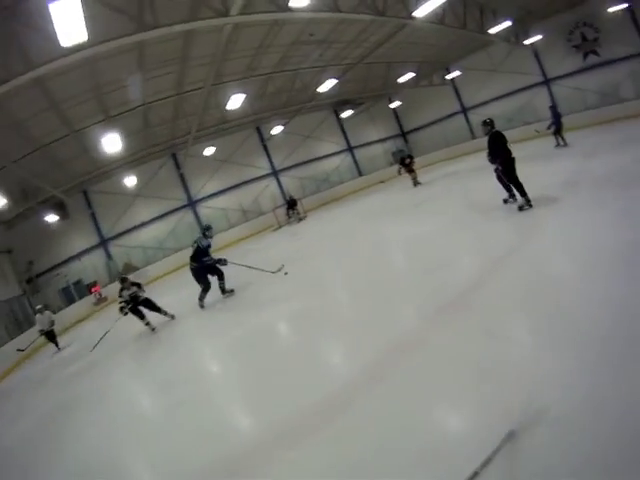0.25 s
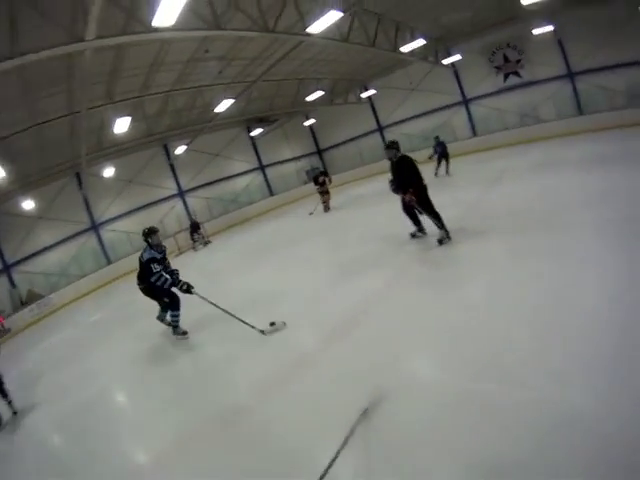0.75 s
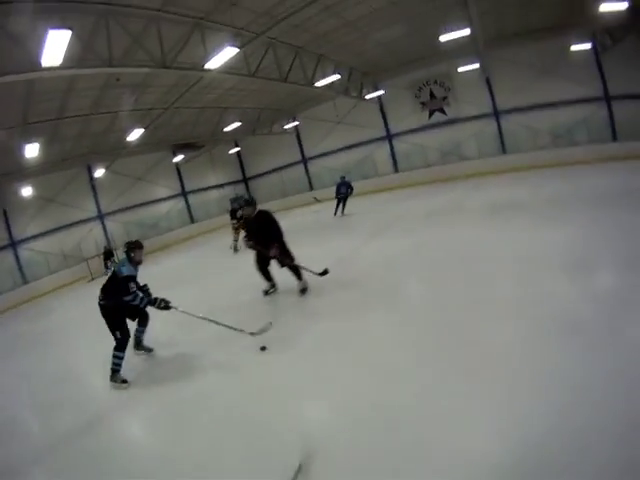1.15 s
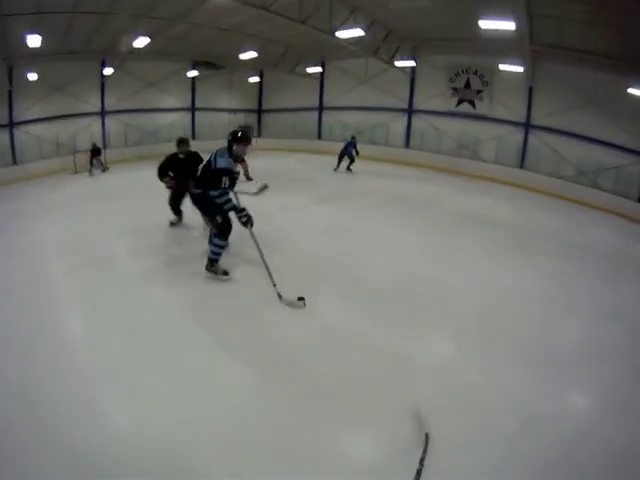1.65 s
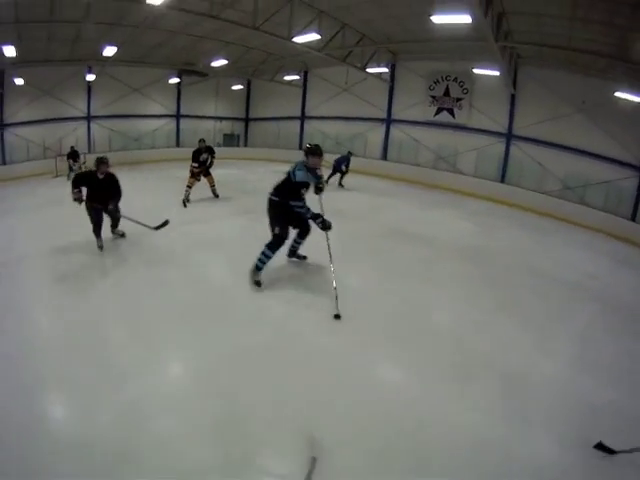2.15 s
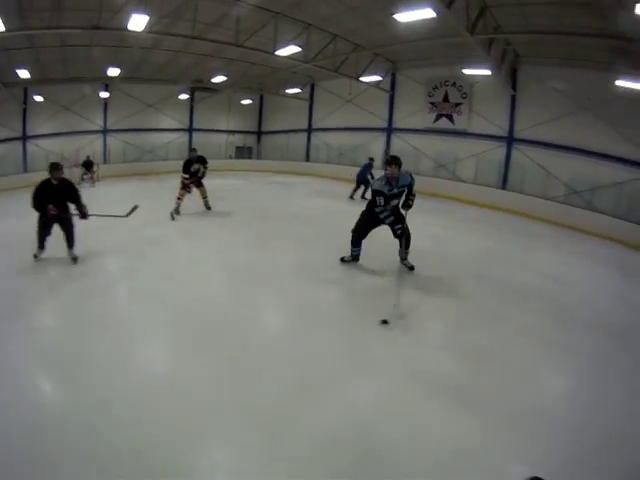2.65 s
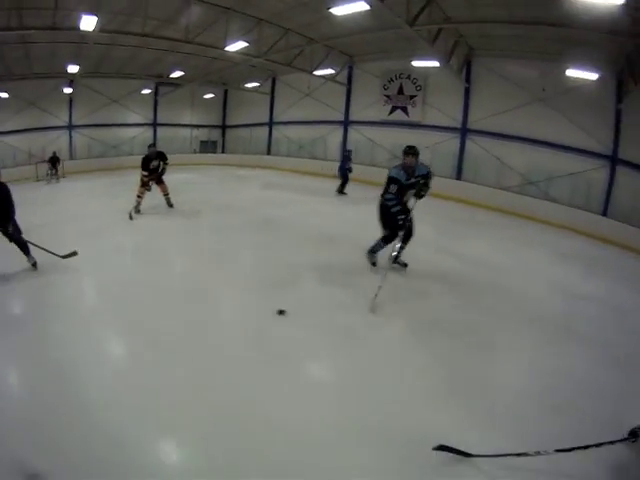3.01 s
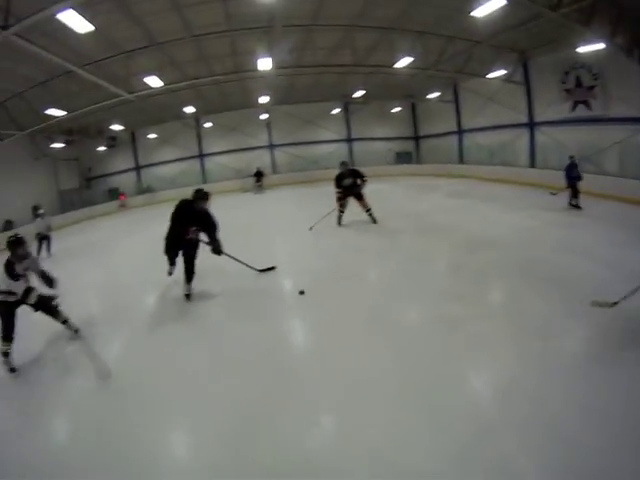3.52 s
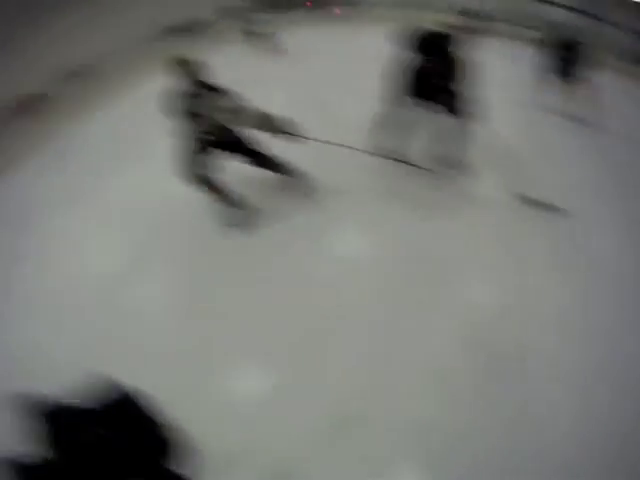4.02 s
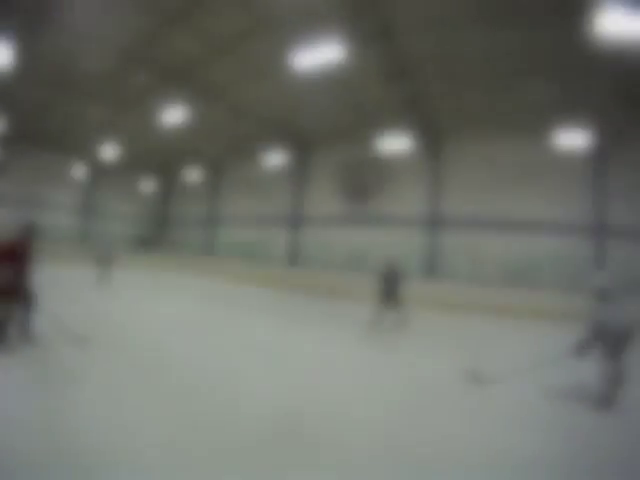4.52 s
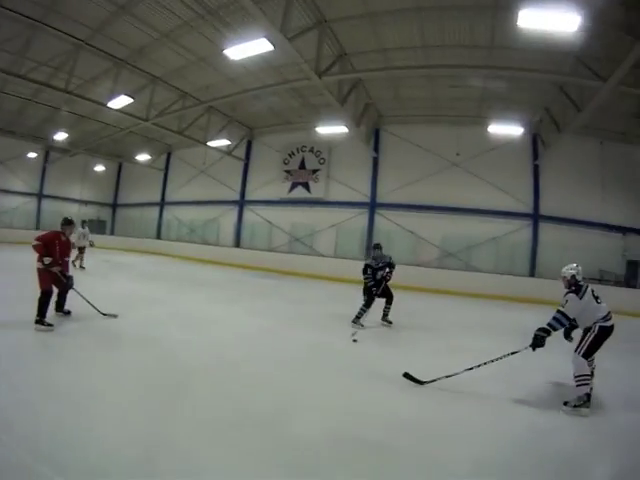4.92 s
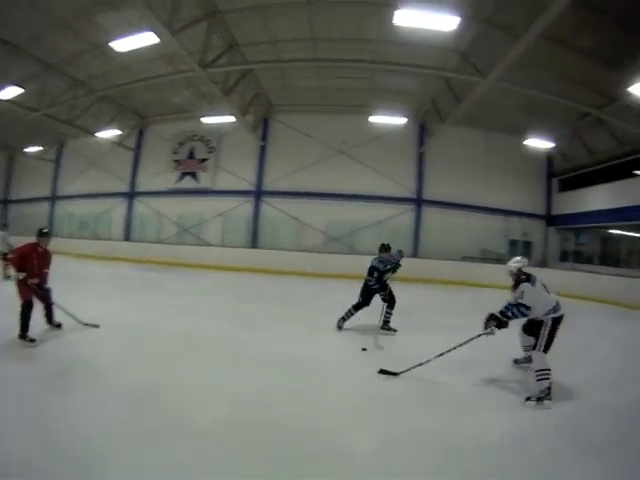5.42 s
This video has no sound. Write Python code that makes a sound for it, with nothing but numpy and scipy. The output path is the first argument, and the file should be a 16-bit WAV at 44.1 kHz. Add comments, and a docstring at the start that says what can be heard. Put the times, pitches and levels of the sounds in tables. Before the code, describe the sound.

Inside a hard helmet case at an indoor ice rink, blades hiss and growl, sticks tap, then sharp cracks lead into a loud spraying turn.

```python
"""Ice hockey inside a helmet-mounted case

An indoor rink heard from inside a hard case on a player's helmet. Blades hiss and growl (noise over random
ice-chip clicks), sticks tap (short noise bursts with a rink tail), and hard stick blows (struck modes, crack,
thud, scrape) lead into a carving turn with spray. Air (low noise) rumbles and buffets the case on the strides;
the helmet bumps (damped modes); peaks and notches of the case colour everything."""
import sys
import numpy as np
from scipy import signal
from scipy.fft import rfft, irfft, next_fast_len
from scipy.io import wavfile
from scipy.ndimage import uniform_filter1d

SR = 44100
rng = np.random.default_rng(int(sys.argv[2]) if len(sys.argv) > 2 else 0)


def output_pcm(signal):
    """Save a mono or channel-first signal as 16-bit PCM at the path in sys.argv[1].

    Samples are clipped to [-1, 1] before scaling.
    """
    pcm = np.clip(np.atleast_2d(signal).T, -1, 1) * 32767
    wavfile.write(sys.argv[1], SR, np.round(pcm).astype(np.int16))


N = 249606
T = np.arange(N) / SR

# All source levels in dB are relative: layer trims and the case follow.
# Air flow past the helmet, easing as the player coasts. Each row: time in seconds, rumble in dB.
AIRFLOW = [(0, -46.5), (.45, -39), (2.0, -45), (2.65, -40.5), (3.0, -47), (4.3, -46.5), (5.25, -50.5),
           (5.66, -46)]
# Gusts on the strides. Each row: start in seconds, big eddies in dB, length in seconds, small eddies in dB.
GUSTS = [(.005, -28.5, 0.04, -45), (0.286, -20, 0.12, -39), (0.68, -23, 0.12, -42), (1.014, -22, 0.12, -38),
         (1.157, -28, 0.072, -44.5), (1.426, -26.5, .09, -62), (1.691, -24.5, 0.0584, -49),
         (2.57, -36.5, 0.126, -57), (3.085, -30, 0.023, -58), (3.831, -29, 0.1, -47),
         (3.948, -28, 0.073, -43.5), (5.565, -31.5, 0.058, -58)]
# Air noise spectra. Each row: frequency in Hz, relative density in dB.
RUMBLE_SPECTRUM = [(15, -17), (33, 1), (48, -9), (65, -4.5), (90, -20), (200, -39), (600, -73)]
FLUTTER_SPECTRUM = [(40, -11), (90, -3.5), (135, 1.5), (200, -9), (300, -13.5), (800, -15.5), (3000, -70)]
GUST_SPECTRUM = [(15, -30), (34, 15), (60, -12), (100, -6.5), (300, -51), (1500, -74)]
FLUTTER_DB, TURN_FLUTTER_DB = -52.5, -43  # small eddies: always there, stronger in the turn
FLUTTER_FOLLOWS = 0.24  # share of the rumble's swing in dB
GUST_TOP_HZ = 257  # low-pass on the small eddies of gusts

# Wash of the other skaters, louder as the play draws near. Each row: time in seconds, level in dB.
DISTANT_SKATES = [(0, -38), (.8, -37.5), (1.1, -35.5), (2.2, -37), (3.5, -33.5), (4.2, -30.5), (4.55, -36),
                  (4.8, -34.5), (5.35, -37.5), (5.55, -32.5)]
# Skating noise spectra. Each row: frequency in Hz, relative density in dB.
HALL_SPECTRUM = [(150, -9), (300, -12), (450, -11), (650, -6.5), (880, 0), (1150, 5.5), (1600, -4),
                 (2400, -3.5), (3000, -6.5), (4500, -15), (8000, -18), (15000, -7.5)]
GROWL_SPECTRUM = [(400, -49), (680, -24), (850, 8.5), (1000, 8), (1250, 3.5), (1600, -33), (2500, -4.5),
                  (6000, -34)]
BLADE_SPECTRUM = [(300, -26), (900, 6.5), (2000, -3.5), (3300, 6.5), (4500, 2.5), (7000, 0.5), (9500, -5.5),
                  (15000, -31)]
SPRAY_SPECTRUM = [(300, -20), (800, -16), (1500, -10.5), (2200, 1.5), (3000, -3.5), (4500, -17),
                  (8000, -15), (10000, -13), (15000, -8)]

# Helmet bumps. Each row: time in seconds, level in dB.
BUMPS = [(.368, -46), (1.58, -35), (3.155, -47), (3.688, -46), (4.161, -23), (4.182, -31.5)]
# Helmet and stick modes. Each row: frequency in Hz, level in dB, T60 in seconds.
HELMET_MODES = [(63.8, -1.5, 0.38), (158, 5, 0.032), (230, 2.5, 0.034), (450, -9.5, 0.017)]
STICK_MODES = [(350, -15, 0.019), (530, -6, 0.028), (736, 1, 0.0067), (1090, 1.5, 0.031),
               (1360, 1.5, 0.011), (1550, -2.5, 0.017), (2070, -1, 0.0094), (2590, -5, 0.018),
               (4200, -13, .01)]

# Stick taps and blade set-downs. Each row: time in seconds, body in dB, bright edge in dB.
TAPS = [(.076, -34, -37.5), (.152, -40, -38.5), (.377, -37, -46), (.917, -27.5, -50), (1.072, -26, -44),
        (1.339, -27.5, -40.5), (1.409, -26, -40), (1.705, -20.5, -35), (1.791, -28.5, -46),
        (2.459, -34, -41), (2.612, -25.5, -36), (2.792, -31, -36.5), (2.853, -28, -36), (2.867, -26, -39),
        (3.584, -26, -42), (3.649, -24, -31), (3.813, -33, -35), (3.871, -36, -25.5), (5.518, -24.5, -33.5),
        (5.563, -24.5, -35), (5.574, -23.5, -44)]
# Ice contact spectra. Each row: frequency in Hz, relative density in dB.
KNOCK_SPECTRUM = [(250, -8.5), (600, 3), (1100, 13.5), (1800, 2), (2600, -11), (4500, -44), (12000, -34)]
GRIT_SPECTRUM = [(1000, -9), (2400, 7.5), (3500, 6.5), (5000, -4.5), (8000, -4), (10000, -3), (15000, 6)]
SCRAPE_SPECTRUM = [(400, -11), (1100, 10.5), (2000, 6), (4000, 4), (7500, 1), (10000, -6), (15000, 6)]
CHIPS_PER_S, CHIP_DB, CHIP_SPREAD_DB = 9, -50.5, 2  # faint ticks of blades all over the rink
RINK_T60_S, RINK_DB = 1.3, -13

# Close blows on a stick. Each row: time in seconds, ring in dB, crack in dB, scrape in dB, drag in seconds.
BLOWS = [(3.7342, -20.8, -4, -12, .0015), (3.7755, -31, -35, -36, .003), (3.8273, -30, 1.5, -20, .018),
         (3.9093, -31, -24, -25, .001)]
REBOUND_S, REBOUND_DB = 0.0012, 1.5  # second landing, relative to the first
DRAG_ATTACK_S, DRAG_RELEASE_DB_PER_S = 0.00034, 2600
THUD_GAIN_DB, THUD_TOP_HZ = 30, 422

# Nearby blade strokes. Each row: start in seconds, attack in seconds, length in seconds, hiss in dB,
# growl of the gouging edge in dB.
STROKES = [(0.145, 0.048, 0.14, -51, -57), (0.853, 0.12, .3, -46.5, -50), (1.262, 0.094, 0.16, -49.5, -57),
           (2.29, 0.16, 0.38, -43.5, -37), (2.507, 0.071, 0.11, -41.5, -36.5), (2.781, .08, 0.32, -43, -46),
           (3.096, 0.061, 0.23, -42.5, -38.5), (3.32, 0.078, 0.14, -43.5, -33),
           (4.57, 0.12, 0.52, -43, -35), (5.425, .04, 0.12, -42, -43)]
STROKE_SAG_DB_PER_S, HISS_RELEASE_DB_PER_S, GROWL_RELEASE_DB_PER_S = 7.5, 25, 70

# Hard turn: the edge bites, throws spray while the skater slows, then lets go.
TURN_START_S, TURN_LENGTH_S, TURN_ATTACK_S = 3.825, 0.38, 0.067
SPRAY_DB, SPRAY_SAG_DB_PER_S, SPRAY_RELEASE_DB_PER_S = -21.5, 10, 36.5
TURN_HISS_DB, TURN_HISS_SAG_DB_PER_S = -28.5, 28.5
# Stick blade sweeping the ice around the puck. Each row: start in seconds, length in seconds, level in dB.
SWEEPS = [(3.696, 0.034, -26), (3.77, 0.019, -23)]
SWEEP_ATTACK_S, SWEEP_RELEASE_DB_PER_S = 0.006, 400

# Case resonances and notches. Each row: frequency in Hz, width in Hz, gain in dB.
CASE = [(1267, 89, 5), (1575, 36.5, 7.5), (1941, 338, 14), (2424, 700, 11.5), (2884, 166, -5.5),
        (3320, 280, 3), (3665, 154, 7.5), (5985, 275, -18.5), (8300, 280, 8.5), (8650, 230, 7.5),
        (9600, 640, 17), (10067, 404, 12), (10850, 410, 10), (11780, 940, -33), (13300, 380, 1),
        (14100, 240, 5), (14160, 440, 8), (15200, 200, -5)]
# Short reflections in a shell. Each row: delay in seconds, strength 0-1 (capped at 0.7 in use).
SHELL = [(.00043, 0.4), (.00097, 0.8), (.00171, 0.3)]
CUTOFF_HZ = 15300


def from_db(db):
    """Decibels to gain."""
    return 10 ** (np.asarray(db) / 20)


def gain_in_time(rows):
    """Gain curve, interpolated in dB."""
    s, db = np.transpose(rows)
    return from_db(np.interp(T, s, db))


def cut(x, hz, kind, order=2):
    """Butterworth low-pass or high-pass."""
    sos = signal.butter(order, min(hz, 0.45 * SR), kind, fs=SR, output="sos")
    return signal.sosfilt(sos, x + 1e-18)


def colour(x, spectrum):
    """Shape a noise by a spectrum interpolated over log frequency."""
    hz, db = np.transpose(spectrum)
    size = next_fast_len(N, real=True)
    bins_hz = np.maximum(np.fft.rfftfreq(size, 1 / SR), 1)
    gain = from_db(np.interp(np.log(bins_hz), np.log(hz), db))
    return irfft(rfft(x, size) * gain, size)[:N]


def drift(points_per_s):
    """Slow random curve with spread near 1."""
    points = rng.standard_normal(N // 20)
    return np.interp(T * points_per_s, np.arange(len(points)), points)


def case(x):
    """Air pocket and shell of the case: a chain of peaks and notches."""
    hz, width_hz, db = np.transpose(CASE)
    root_gain = from_db(db / 2)
    half = np.tan(np.pi * width_hz / SR)
    c = -2 * np.cos(2 * np.pi * hz / SR)
    numerator = [1 + half * root_gain, c, 1 - half * root_gain]
    denominator = [1 + half / root_gain, c, 1 - half / root_gain]
    sections = np.transpose(np.array(numerator + denominator) / denominator[0])
    return signal.sosfilt(np.ascontiguousarray(sections), x + 1e-18)


def unit(x):
    """Scale a sound to rms 1 inside the case."""
    return x / np.std(case(x))


def clicks(times_s, levels_db):
    """One impulse per contact."""
    out = np.zeros(N)
    out[np.round(np.asarray(times_s) * SR).astype(int)] = from_db(levels_db)
    return out


def ring(force, modes):
    """Damped modes struck by a force, with alternating signs."""
    out = np.zeros(N)
    for k, (hz, db, t60_s) in enumerate(modes):
        r = from_db(-60 / (t60_s * SR))
        w = 2 * np.pi * hz / SR
        mode = signal.lfilter([0, from_db(db) * np.sin(w)], [1, -2 * r * np.cos(w), r * r], force + 1e-18)
        out += (-1) ** k * mode
    return out


def fade(t60_s):
    """Exponential decay from 1 at time zero."""
    return np.exp(-np.log(1000) * np.minimum(T / t60_s, 10))


def smear(x):
    """All-pass shell reflections spread each click over milliseconds and leave its spectrum alone."""
    for delay_s, strength in SHELL:
        loop = np.zeros(round(delay_s * SR) + 1)
        loop[0], loop[-1] = 1, min(strength, 0.7)
        x = signal.lfilter(loop[::-1], loop, x + 1e-18)
    return x


def crunch(per_s, spread_db, smooth):
    """Ice chips break at random with uneven sizes, over a smooth hiss."""
    sizes = from_db(spread_db * np.minimum(rng.exponential(1, N), 4))
    signed_sizes = sizes * rng.choice([-1, 1], N)
    broken = smear(signed_sizes * (rng.random(N) < per_s / SR))
    return broken / np.std(broken) + smooth * rng.standard_normal(N)


def even(x, evenness, size):
    """Hold a noise's strength fairly steady over a window of samples."""
    power = uniform_filter1d(uniform_filter1d(x * x, size=size), size=size)
    return x / np.sqrt(np.abs(power) + 1e-18) ** np.clip(evenness, 0, 1)


def rasp(spectrum):
    """Dense, even noise of a blade crushing ice."""
    return unit(even(colour(rng.standard_normal(N), spectrum), evenness=1, size=60))


def swell(start_s, length_s, attack_s, sag_db_per_s, release_db_per_s):
    """A blade's contact bites, sags while held, and dies away after it lifts."""
    age_s = np.maximum(T - start_s, 0)
    held_s = np.minimum(age_s, length_s)
    lifted_s = np.maximum(age_s - length_s, 0)
    loss_db = sag_db_per_s * held_s + release_db_per_s * lifted_s
    return np.minimum(age_s / attack_s, 1) * from_db(-np.minimum(loss_db, 200))


def turn():
    """Effort of the hard turn, 0-1."""
    return swell(TURN_START_S, TURN_LENGTH_S, TURN_ATTACK_S, SPRAY_SAG_DB_PER_S, SPRAY_RELEASE_DB_PER_S)


def contact_envelope(times_s, levels_db, rise_s, t60_s):
    """Each contact crushes ice for some milliseconds."""
    shape = fade(t60_s) * (1 - np.exp(-T / rise_s))
    return signal.fftconvolve(clicks(times_s, levels_db), shape / shape.max())[:N]


def eddies(spectrum, evenness):
    """Low turbulence with its level partly evened out."""
    return unit(even(colour(rng.standard_normal(N), spectrum), evenness, size=1000))


def wind():
    """Air rumbles and flutters on the case and buffets it as the player strides."""
    rumble = gain_in_time(AIRFLOW)
    base_flutter = from_db(FLUTTER_DB) * (rumble / rumble.mean()) ** FLUTTER_FOLLOWS
    flutter = np.hypot(base_flutter, from_db(TURN_FLUTTER_DB) * turn())
    steady = from_db(4.5) * rumble * eddies(RUMBLE_SPECTRUM, evenness=0.65)
    steady += flutter * eddies(FLUTTER_SPECTRUM, evenness=0.23)
    steady *= from_db(1.37 * drift(16))
    big, small = np.zeros(N), np.zeros(N)
    for s, big_db, length_s, small_db in GUSTS:
        arch = np.sin(np.pi * np.clip((T - s) / length_s, 0, 1))
        big += from_db(big_db) * arch
        small += from_db(small_db) * arch
    small_eddies = cut(eddies(FLUTTER_SPECTRUM, evenness=0.5), GUST_TOP_HZ, "low")
    return steady + big * eddies(GUST_SPECTRUM, evenness=0.63) + small * small_eddies


def distant_skates():
    """Many far blades break ice at random and merge into a wash that flutters in level."""
    wash = unit(colour(crunch(per_s=700, spread_db=3.0, smooth=1.54), HALL_SPECTRUM))
    return gain_in_time(DISTANT_SKATES) * wash * from_db(-1.5 + 1.1 * drift(60))


def ice_chips():
    """Small chips snap off the ice at random moments as short noise bursts."""
    born = rng.random(N) < CHIPS_PER_S / SR
    sizes_db = CHIP_DB + CHIP_SPREAD_DB * np.clip(rng.standard_normal(N), -2, 2)
    envelope = contact_envelope(T[born], sizes_db[born], rise_s=0.0005, t60_s=0.018)
    return envelope * (rasp(GRIT_SPECTRUM) + rasp(KNOCK_SPECTRUM))


def helmet_bumps():
    """Each bump strikes the helmet's damped modes."""
    return ring(clicks(*np.transpose(BUMPS)), HELMET_MODES)


def rink(x):
    """Boards and steel roof return a long, dull tail: decaying band-limited noise."""
    tail = cut(cut(rng.standard_normal(N), 7400, "low", order=1), 1100, "high", order=1)
    tail = tail * fade(RINK_T60_S) * (1 - np.exp(-T / 0.01))
    return signal.fftconvolve(x, tail / np.linalg.norm(tail))[:N]


def taps():
    """Sticks and blades meet the ice: a woody body and a bright gritty edge."""
    s, body_db, edge_db = np.transpose(TAPS)
    body = contact_envelope(s, body_db, rise_s=0.0012, t60_s=0.026)
    edge = contact_envelope(s, edge_db, rise_s=0.0008, t60_s=0.024)
    return from_db(-4.5) * body * rasp(KNOCK_SPECTRUM) + from_db(8.5) * edge * rasp(GRIT_SPECTRUM)


def double_hit(times_s, levels_db):
    """A hard contact lands twice in quick succession."""
    return clicks(times_s, levels_db) + clicks(times_s + REBOUND_S, levels_db + REBOUND_DB)


def blows():
    """A hard contact cracks, thuds, rings the stick's modes, and drags its blade across the ice."""
    s, ring_db, crack_db, _, _ = np.transpose(BLOWS)
    stick = ring(double_hit(s, ring_db), STICK_MODES)
    crack = cut(cut(double_hit(s, crack_db), 5100, "high"), 5300, "low", order=3)
    thud = cut(cut(clicks(s, ring_db), THUD_TOP_HZ, "low"), 250, "high")
    drag = np.zeros(N)
    for start_s, _, _, scrape_db, length_s in BLOWS:
        drag += from_db(scrape_db) * swell(start_s, length_s, DRAG_ATTACK_S, 0, DRAG_RELEASE_DB_PER_S)
    scrape = from_db(2.5) * drag * rasp(SCRAPE_SPECTRUM)
    return stick + from_db(13) * crack + from_db(THUD_GAIN_DB) * thud + scrape


def near_blades():
    """Near blades hiss and gouging edges growl; stick and slip makes both flutter in level."""
    hiss = from_db(TURN_HISS_DB) * swell(
        TURN_START_S, TURN_LENGTH_S, TURN_ATTACK_S, TURN_HISS_SAG_DB_PER_S, HISS_RELEASE_DB_PER_S)
    growl = np.zeros(N)
    for s, attack_s, length_s, hiss_db, growl_db in STROKES:
        hiss_swell = swell(s, length_s, attack_s, STROKE_SAG_DB_PER_S, HISS_RELEASE_DB_PER_S)
        growl_swell = swell(s, length_s, attack_s, STROKE_SAG_DB_PER_S, GROWL_RELEASE_DB_PER_S)
        hiss = np.hypot(hiss, from_db(hiss_db) * hiss_swell)
        growl = np.hypot(growl, from_db(growl_db) * growl_swell)
    hiss_noise = unit(colour(crunch(per_s=2500, spread_db=4.0, smooth=0.95), BLADE_SPECTRUM))
    growl_noise = unit(colour(crunch(per_s=1200, spread_db=7.5, smooth=2.06), GROWL_SPECTRUM))
    hiss_noise *= from_db(-0.5 + 1.7 * drift(90))
    growl_noise *= from_db(-6.0 + 1.3 * drift(40))
    return hiss * hiss_noise + growl * growl_noise


def ice_spray():
    """The turning edge and the sweeping stick shave the ice into a fluttering spray of chips."""
    shaving = from_db(SPRAY_DB) * turn()
    for s, length_s, db in SWEEPS:
        shaving += from_db(db) * swell(s, length_s, SWEEP_ATTACK_S, 0, SWEEP_RELEASE_DB_PER_S)
    spray = unit(colour(crunch(per_s=1200, spread_db=3.0, smooth=0.8), SPRAY_SPECTRUM))
    return shaving * spray * from_db(-3.0 + 1.55 * drift(160))


def scene():
    """Sum the air, skating, helmet bumps, and stick work with its rink tail."""
    sticks = taps() + blows()
    background = wind() + distant_skates() + ice_chips() + helmet_bumps()
    mix = background + sticks + from_db(RINK_DB) * rink(sticks) + near_blades() + ice_spray()
    return mix[None]


def record(dry):
    """The case colours the sound, peaks are rounded, the top is cut."""
    inside = 1.2 * np.tanh(case(dry) / 1.2)
    return signal.sosfilt(signal.ellip(12, 0.1, 85, CUTOFF_HZ, fs=SR, output="sos"), inside)


dry = scene()
out = record(dry)
output_pcm(out)
```